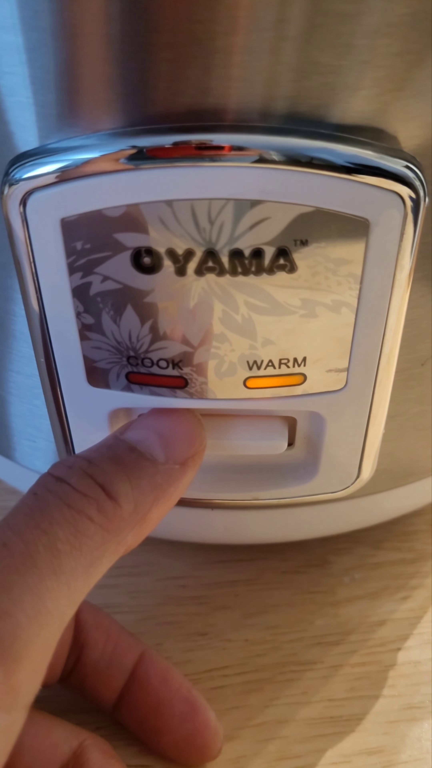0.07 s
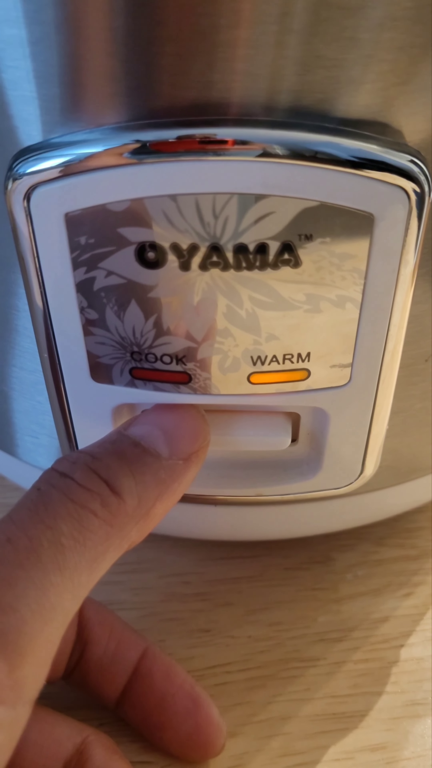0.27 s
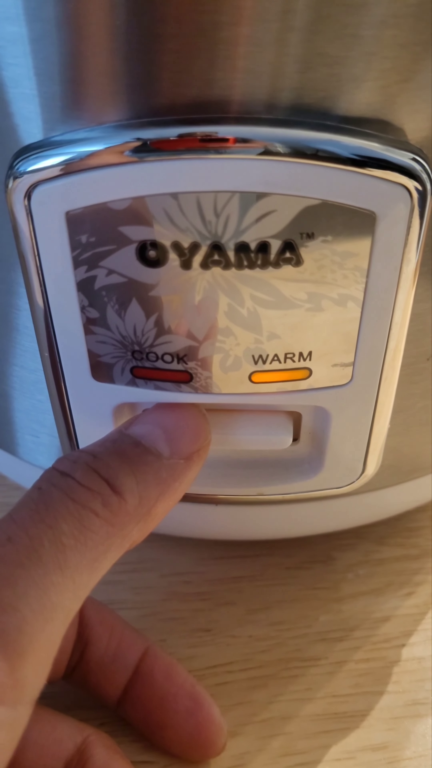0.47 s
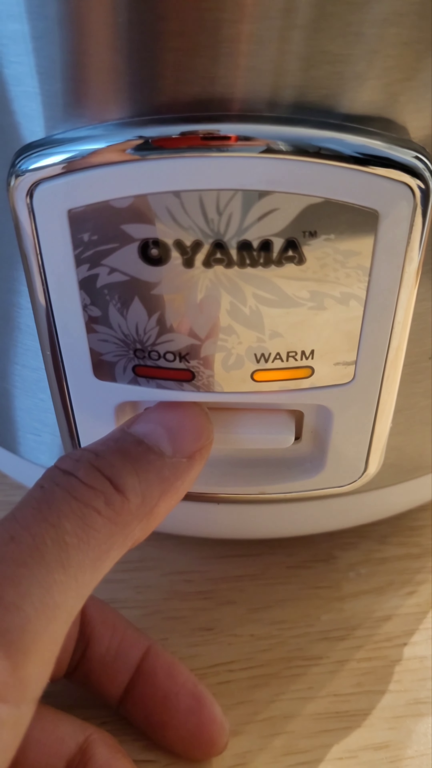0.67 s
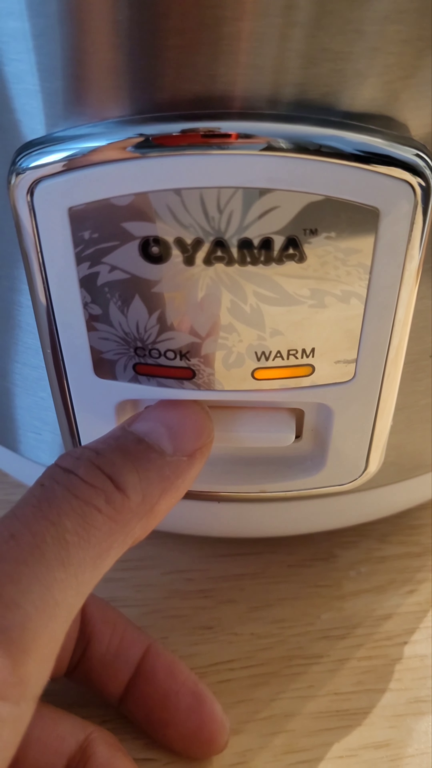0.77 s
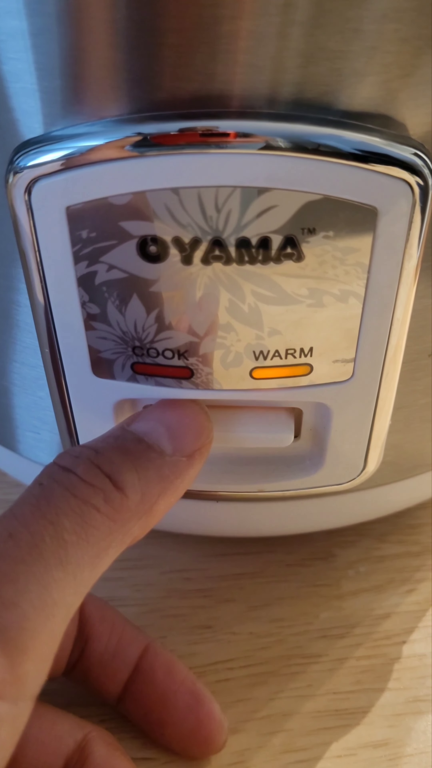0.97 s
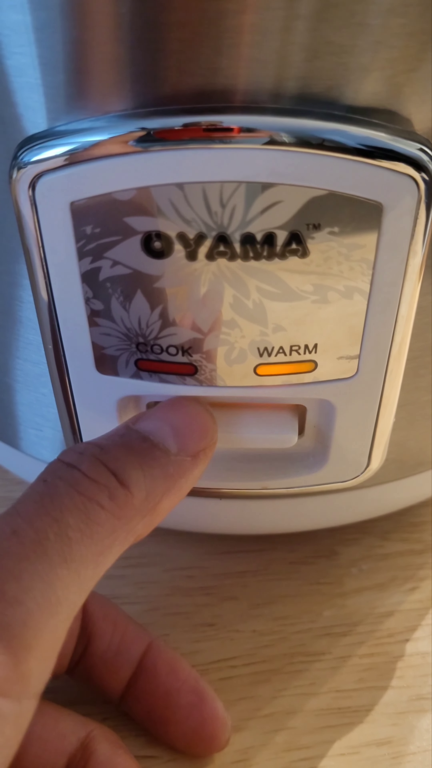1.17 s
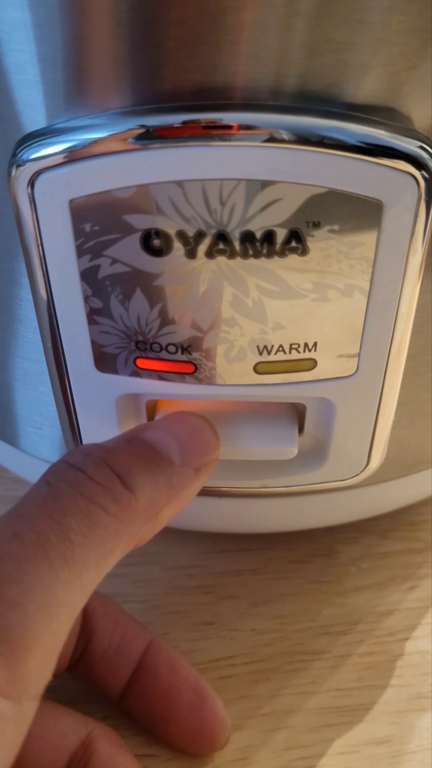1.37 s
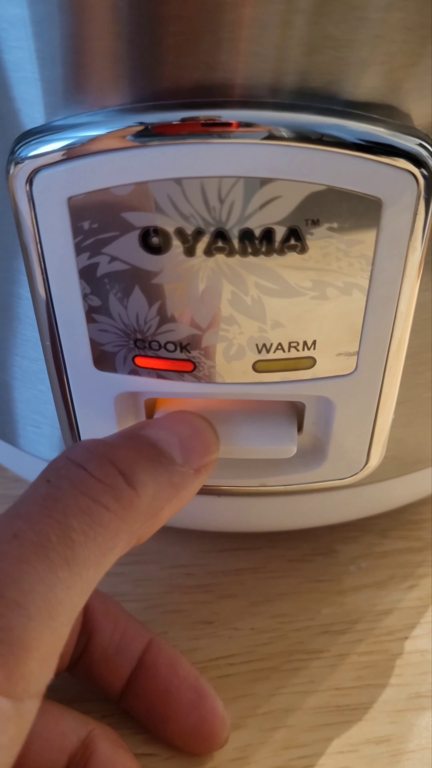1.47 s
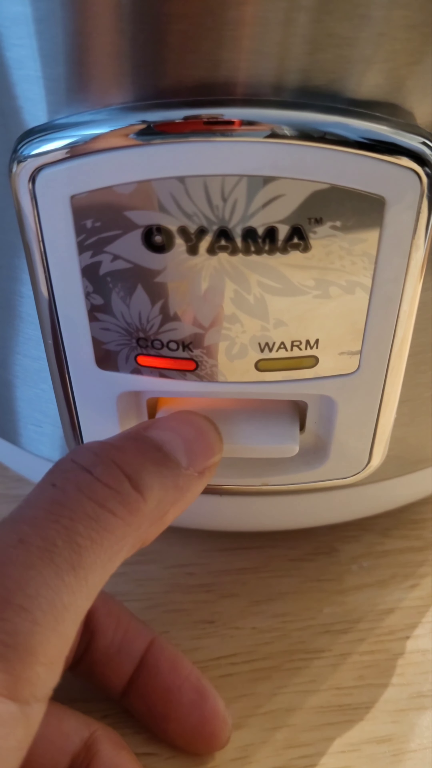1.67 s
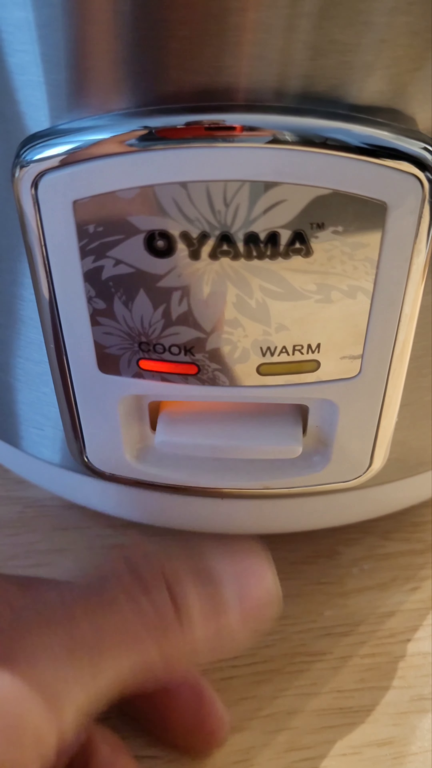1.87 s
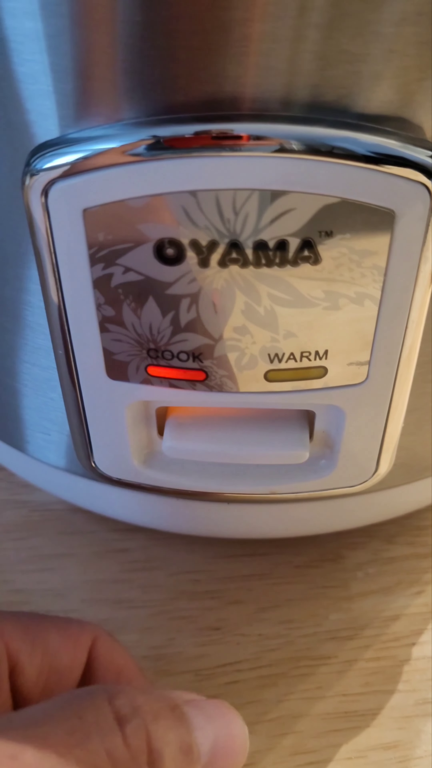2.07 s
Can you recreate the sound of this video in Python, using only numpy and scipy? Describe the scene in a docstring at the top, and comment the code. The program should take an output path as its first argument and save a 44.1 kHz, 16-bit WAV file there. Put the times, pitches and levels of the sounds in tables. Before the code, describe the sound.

Close to the microphone, a rice cooker lever scrapes faintly and snaps into place, briefly ringing the hollow housing. A softer click follows as it is released, over the faint hum and hiss of a quiet kitchen.

```python
"""A faint scrape, then a sharp snap: a thumb presses down the switch lever of a rice cooker,
close to a stereo microphone in a quiet kitchen. The latch slips, the steel lever snaps home and
rings the hollow housing; as the thumb lets go, the lever settles with a fainter click.
The room answers with a short echo. Under it lie a wavering low hum, a soft rumble and faint hiss."""
import sys
import numpy as np
from scipy import signal
from scipy.fft import irfft, next_fast_len
from scipy.io import wavfile
from scipy.ndimage import uniform_filter1d

SR = 44100
rng = np.random.default_rng(int(sys.argv[2]) if len(sys.argv) > 2 else 0)


def materialize(psi):
    """Save the field psi as 16-bit PCM at rate SR to the path in sys.argv[1].

    A 1-D psi becomes a single channel; in a 2-D psi each row is a channel.
    """
    bounded = np.clip(np.atleast_2d(psi).T, -1, 1)
    quanta = np.round(bounded * 32767).astype(np.int16)
    wavfile.write(sys.argv[1], SR, quanta)


N = 94065
RING_SAMPLES = 16384

# Contacts of the lever, close up:
# start_s, crack_db, tilt_db_per_octave, crack_t60_s, steel_db, housing_db, handle_db
LEVER_CONTACTS = [ (1.3067, -38, 2.5, .055, -38, -55, -39), (1.3118, -40, 4, .05, -38, -43.5, -50),
                  (1.3272, -21.5, 0, 0.039, -33, -41, -40), (1.3303, -18.5, -0.05, 0.025, -23.5, -28, -42),
                  (1.3329, -26.5, -1.5, 0.066, -36.5, -15, -42), (1.5970, -53.5, 8, 0.05, -90, -74, -76),
                  (1.7685, -64.5, 5.5, .08, -91, -80, -83), (1.9348, -39.5, 1.5, 0.036, -58, -40.5, -41),
                  (1.9415, -37.5, -1.5, 0.029, -52, -41.5, -33.5),
                  (1.9466, -45.5, -4.5, 0.027, -51.5, -37.5, -42.5)]

def lever():
    """Each contact cracks and rings the steel arm, the hollow housing and the plastic handle."""
    cracks, rings = np.zeros((2, N)), np.zeros((2, N))
    steel, housing, handle = struck_parts()
    for start_s, crack_db, tilt, t60_s, steel_db, housing_db, handle_db in LEVER_CONTACTS:
        add(cracks, start_s, crack(crack_db, tilt, t60_s))
        add(rings, start_s, amp(steel_db) * steel + amp(housing_db) * housing + amp(handle_db) * handle)
    return cracks, rings


# Spectrum of the mechanism's crack: frequency_hz, level_db
CRACK_SPECTRUM = [(60, -16.5), (300, -2.5), (650, 0), (1000, -3), (1400, -7), (1750, 4), (3300, -0.5),
                  (5500, -1.5), (7500, 0), (11000, -9), (15000, -7)]
# Its balance at the microphone: frequency_hz, left_minus_right_db
CRACK_PAN = [(300, -1.5), (2000, -0.5), (6000, -1), (9000, 0.5), (14000, 5)]

def crack(level_db, tilt_db_per_octave, t60_s, rise_s=0.0008, pivot_hz=4000):
    """One contact excites short modes so crowded that they merge into a burst of noise."""
    def spectrum_db(hz):
        tilt_db = tilt_db_per_octave * np.log2(np.maximum(hz / pivot_hz, 0.1))
        pan_db = np.array([[.5], [-.5]]) * read(CRACK_PAN, hz)
        return read(CRACK_SPECTRUM, hz) + tilt_db + pan_db

    t = np.arange(RING_SAMPLES // 2) / SR
    envelope = amp(level_db - 60 * t / t60_s) * (1 - np.exp(-t / rise_s))
    return envelope * noise(spectrum_db, size=len(t))


# Modes of the arm, housing and handle: pitch_hz, t60_s (capped by max_cycles), left_db, right_db
STEEL_MODES = [(1687, .09, -11, -6), (1812, 0.089, -11, -6.5), (2083, .22, -15, -13),
               (2380, .13, -4.5, -16.5), (2455, .16, -14, -18), (2820, 0.094, -13.5, -7),
               (4090, 0.059, 0, -5.5), (4204, 0.038, -6, -9), (5240, .03, -8, -8.5), (5910, .03, -7.5, -7),
               (6626, 0.06, -5.5, -4), (7040, 0.06, -5, -3.5), (7435, 0.045, -9, -7.5)]
HOUSING_MODES = [(273, .2, -20.5, -31), (330.5, .22, -24.5, -24.5), (384.2, .16, -17, -15),
                 (563, 0.14, -23.5, -23.5), (800.3, .11, -9.5, -11), (847, .11, -8.5, -1.5),
                 (974, .05, -16.5, -24.5), (1161, 0.068, -24.5, -25.5)]
HANDLE_MODES = [(1146, .1, -14, -14.5), (1448, 0.082, -12.5, -13.5), (3888, .055, -2.5, -6),
                (4590, .045, -5.5, -8.5), (4980, .04, -9, -10.5), (5454, .03, -6.5, -9),
                (9570, .02, -12.5, -15), (14100, .012, -5, -9.5)]

def struck_parts():
    """The rings of the three parts; metal can ring for more cycles than plastic."""
    return (ring(STEEL_MODES, lag_s=0.00017, max_cycles=420),
            ring(HOUSING_MODES, lag_s=0.00012, max_cycles=420),
            ring(HANDLE_MODES, lag_s=0.00017, max_cycles=220))


def ring(modes, lag_s, max_cycles, rise_s=0.00067):
    """A struck part's modes die away, reaching the right microphone lag_s after the left."""
    t = np.maximum(np.arange(RING_SAMPLES) / SR - np.array([[0], [lag_s]]), 0)
    tones = np.zeros_like(t)
    for hz, t60_s, left_db, right_db in modes:
        decay_db = 60 * t / min(t60_s, max_cycles / hz)
        tones += amp(np.array([[left_db], [right_db]]) - decay_db) * np.sin(2 * np.pi * hz * t)
    return tones * (1 - np.exp(-t / rise_s))


# Dull knocks of the cooker's body: start_s, level_db, pitch_hz, length_s
BODY_KNOCKS = [(1.3275, -34, 340, .009), (1.3390, -26, 374.4, .010), (1.3260, -39, 148.4, 0.028),
               (1.3105, -39.5, 330, 0.016), (1.9165, -35, 255, 0.0114), (1.9400, -33.5, 290, 0.0073)]

def body_knocks(lag_s=0.00034):
    """The body rocks for a few soft cycles, heard slightly later on the right."""
    knocks = np.zeros((2, N))
    for start_s, level_db, pitch_hz, length_s in BODY_KNOCKS:
        t = np.arange(0, length_s + lag_s, 1 / SR)
        t = np.clip(t - np.array([[0], [lag_s]]), 0, length_s)
        swell = amp(level_db) * np.sin(np.pi * t / length_s)
        add(knocks, start_s, swell * np.sin(2 * np.pi * pitch_hz * t))
    return knocks


# Scrapes of the lever: start_s, length_s, level_db, centre_hz, width_octaves
SLOT_SCRAPES = [(1.119, 0.073, -78.5, 1860, .08), (1.092, 0.23, -69.5, 601, 0.49),
                (1.278, .05, -58.5, 730, 0.64), (1.730, .10, -78, 13000, .12),
                (1.888, 0.036, -64, 755, 0.61), (1.890, 0.033, -57, 328, 0.27),
                (1.92, 0.031, -53.5, 1190, 1.0), (2.024, 0.019, -66.5, 1520, 0.077)]

def slot_scrapes():
    """The lever rubs in its slot: faint bands of noise that swell and fade."""
    scrapes = np.zeros((2, N))
    t = np.arange(RING_SAMPLES // 2) / SR
    for start_s, length_s, level_db, centre_hz, width_octaves in SLOT_SCRAPES:
        swell = amp(level_db) * np.sin(np.pi * np.minimum(t / length_s, 1))
        add(scrapes, start_s, swell * noise(hump(centre_hz, width_octaves), size=len(t)))
    return scrapes


# Decay of the kitchen's echo: frequency_hz, t60_s
KITCHEN_DECAY = [(120, 0.2), (400, 0.56), (900, 0.58), (2000, 0.34), (5000, 0.34), (9000, 0.34),
                 (15000, 0.26)]
# Strength of the echo at the microphone: frequency_hz, level_db
KITCHEN_SPECTRUM = [(120, -7.5), (250, -8), (500, -3), (850, -8.5), (1300, -8), (2000, -2.5), (5000, -5.5),
                    (9000, -6), (15000, -5)]

def kitchen_echo(sound, delay_s=0.0062, rise_s=0.013):
    """Diffuse echo of a small hard room, each band dying at its own speed."""
    hz, t, bands = signal.stft(noise(np.zeros_like, size=SR // 2), SR, nperseg=256)
    t60_s = read(KITCHEN_DECAY, hz)[:, None]
    bands *= amp(read(KITCHEN_SPECTRUM, hz)[:, None] - 60 * t / t60_s)
    bands *= np.sqrt(2 * np.log(1000) / (t60_s * SR))  # a longer decay adds no energy
    tail = signal.istft(bands, SR, nperseg=256)[1]
    tail *= np.clip((np.arange(tail.shape[1]) / SR - delay_s) / rise_s, 0, 1)
    return signal.fftconvolve(sound, tail, axes=1)[:, :N]


# Swells of the low hum: time_s, level_db
HUM_LEVEL = [(0, -73), (.24, -60), (.46, -79.5), (.63, -56.5), (.75, -72), (.92, -62.5), (1.03, -76.5),
             (1.13, -60), (1.29, -56.5), (1.44, -57.5), (1.52, -75), (1.56, -58.5), (1.68, -61.5),
             (1.72, -55.5), (1.81, -52.5), (1.88, -67.5), (2.13, -74.5)]

def hum(pitch_hz=113.7, waver_hz=2):
    """A low tone, alike in both microphones, wavering in pitch and level."""
    drift = unit(uniform_filter1d(uniform_filter1d(rng.standard_normal(N), 3000), 3000))
    phase = 2 * np.pi * np.cumsum(pitch_hz + waver_hz * drift) / SR
    return np.sqrt(2) * np.sin(phase) * gain_curve(HUM_LEVEL)


# Swells of the deep rumble: time_s, level_db
RUMBLE_LEVEL = [(0, -82.5), (.5, -77.5), (.63, -58.5), (.75, -72), (.92, -68.5), (1.03, -79), (1.13, -61),
                (1.29, -70), (1.35, -51), (1.5, -76.5), (1.7, -80.5), (1.79, -53), (1.87, -71),
                (1.95, -62.5), (2.13, -89)]

def rumble():
    """A narrow band of bass noise that comes and goes."""
    return noise(hump(centre_hz=74, width_octaves=0.26)) * gain_curve(RUMBLE_LEVEL)


# Room tone of the kitchen: frequency_hz, level_db
AIR_SPECTRUM = [(20, -22), (60, -10), (95, -10), (160, 0.81), (195, -7), (230, -1), (270, -7), (320, -3),
                (400, -11), (700, -18), (1000, -18), (1250, -34), (2200, -41), (9000, -46), (15000, -44)]

def room_air(left_db=-62, right_db=-60.5):
    """Steady, dark room noise, a little stronger on the right."""
    return noise(lambda hz: read(AIR_SPECTRUM, hz)) * amp([[left_db], [right_db]])


# Microphone hiss: frequency_hz, level_db
HISS_SPECTRUM = [(3000, -41.5), (4000, -10.5), (4500, -14), (4800, -4), (5600, -1), (7300, -1.5),
                 (7800, -7), (8200, -44)]

def microphone_hiss(level_db=-73.5):
    """A thin, steady hiss in the left microphone only."""
    return noise(lambda hz: read(HISS_SPECTRUM, hz)) * amp(level_db) * np.array([[1], [0]])


# Likeness of the left and right microphones: frequency_hz, correlation
STEREO_LIKENESS = [(60, .92), (130, 0.96), (290, 0.79), (640, .25), (1400, 0)]

def noise(spectrum_db, size=N):
    """Stereo noise of rms 1 with a given spectrum, nearly mono in the bass."""
    padded = next_fast_len(size, True)
    hz = np.fft.rfftfreq(padded, 1 / SR)
    left, unrelated = np.exp(2j * np.pi * rng.random((2, len(hz))))
    likeness = read(STEREO_LIKENESS, hz)
    right = likeness * left + np.sqrt(1 - likeness ** 2) * unrelated
    return unit(irfft(np.array([left, right]) * amp(spectrum_db(hz)), padded)[:, :size])


def hump(centre_hz, width_octaves):
    """A bell-shaped spectrum in dB."""
    return lambda hz: -10 / np.log(10) * (np.log2((hz + 1) / centre_hz) / width_octaves) ** 2 / 2


def read(points, hz):
    """Reads a table on a log-frequency axis."""
    table_hz, values = np.transpose(points)
    return np.interp(np.log(hz + 1), np.log(table_hz + 1), values)


def gain_curve(points):
    """Gain at every sample from rows of time_s, level_db."""
    return amp(np.interp(np.arange(N) / SR, *np.transpose(points)))


def amp(db):
    """Decibels to gain."""
    return 10 ** (np.asarray(db) / 20)


def unit(x):
    """Scales to rms 1."""
    return x / np.sqrt(np.mean(x ** 2) + 1e-20)


def add(mix, start_s, sound):
    """Mixes a sound in at start_s."""
    part = mix[:, round(start_s * SR):][:, :sound.shape[-1]]
    part += sound[..., :part.shape[1]]


def scene():
    """The switch close to the microphone, its echo and the quiet kitchen behind."""
    cracks, rings = lever()
    blows = cracks + body_knocks() + slot_scrapes()
    echo = kitchen_echo(blows + amp(-5) * rings)  # the close rings fill the room less than the cracks
    return blows + rings + echo + room_air() + hum() + rumble() + microphone_hiss()


def record(dry, cutoff_hz=15900):
    """The recorder's band limit cuts the highest treble."""
    lowpass = signal.firwin(401, cutoff_hz, window=("kaiser", 9), fs=SR)
    return signal.oaconvolve(dry, lowpass[None], "same")


dry = scene()
out = record(dry)
materialize(out)
```